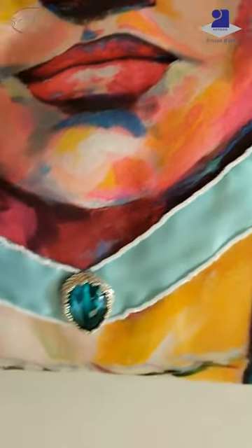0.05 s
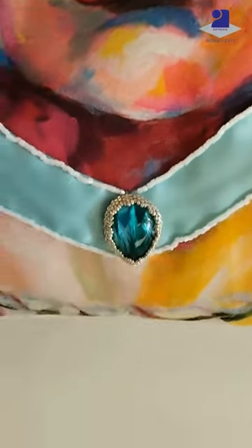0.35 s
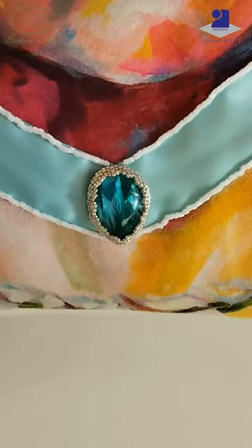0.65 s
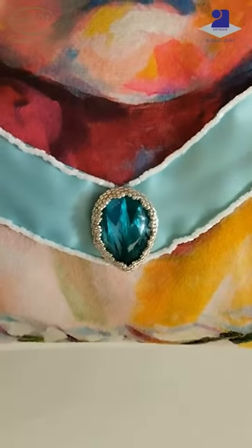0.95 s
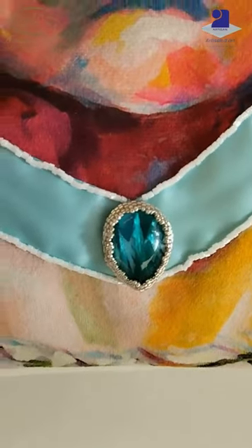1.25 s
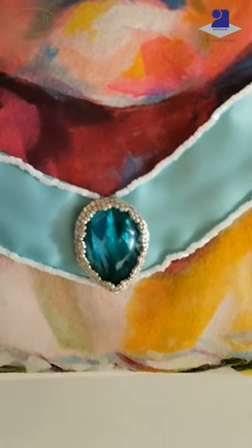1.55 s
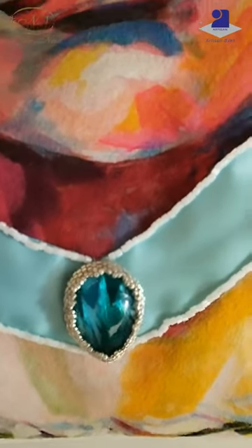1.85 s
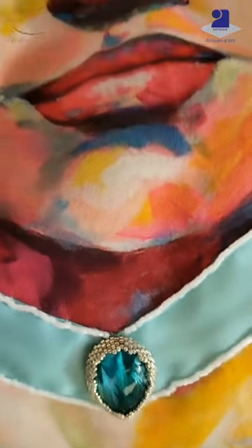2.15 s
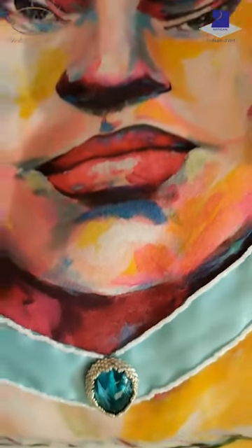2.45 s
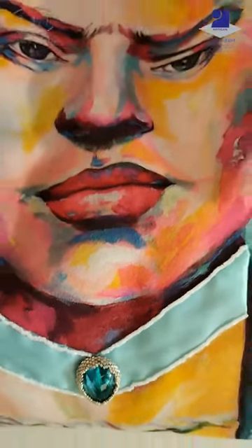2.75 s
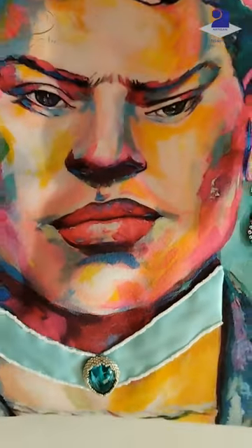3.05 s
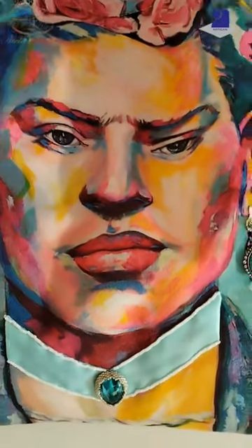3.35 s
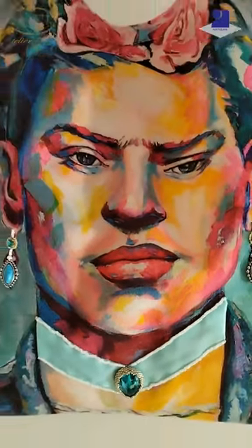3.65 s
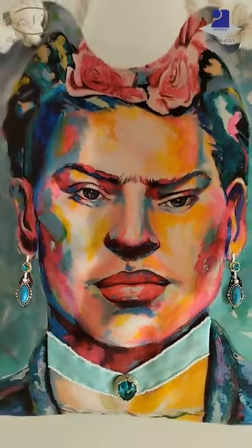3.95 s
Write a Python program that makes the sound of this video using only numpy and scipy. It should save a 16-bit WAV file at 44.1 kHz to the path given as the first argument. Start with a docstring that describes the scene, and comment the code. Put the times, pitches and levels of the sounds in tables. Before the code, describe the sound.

Quiet room tone runs for all 4 seconds, with faint microphone hiss and a deep rumble that comes and goes. A low hum swells around 0.5 seconds and again after 3. Tiny camera clicks come near 1 and 1.5 seconds. Soft handling rustles are scattered throughout, clustering around 3 seconds. A far roar, likely traffic, grows from 2 seconds, with a low engine throb rising near the end.

```python
"""A steady wash of air in a quiet room, over the faint hiss of a hand-held camera's microphone.
A deep rumble comes and goes, a wavering hum swells twice, and a far roar, likely traffic, slowly grows.
The hand on the camera makes two tiny clicks of the case and soft rustles of skin and sleeve.
Air, roar and handling are shaped noise; the hum, a shudder and an engine throb are wavering sines."""
import sys
import numpy as np
from scipy import signal
from scipy.fft import rfft, irfft
from scipy.io import wavfile

SR = 44100
rng = np.random.default_rng(int(sys.argv[2]) if len(sys.argv) > 2 else 0)


def dump_mix(stems):
    """Bounce the given channels to the path in sys.argv[1] as a 16-bit WAV at rate SR."""
    frames = np.atleast_2d(stems).T  # one column per channel
    limited = np.clip(frames, -1, 1)  # hard clip at full scale
    pcm = np.round(limited * 32767).astype(np.int16)
    wavfile.write(sys.argv[1], SR, pcm)


N = 176400
TIME, FREQS = np.arange(N) / SR, np.fft.rfftfreq(N, 1 / SR)


def air(wash_db=-60, whine_db=-86.5):
    """Room tone: a dark, steady wash of air with a thin appliance whine."""
    # colour of the air: freq_hz, level_db
    spectrum = [(25, 1.5), (60, 2), (100, -2.5), (170, -6), (270, -7.5), (370, -15.5), (540, -18),
                (680, -20), (1000, -21.5), (1400, -25), (1700, -28), (2300, -29), (3000, -33),
                (5000, -38.5), (8000, -51), (15000, -60)]
    wash = patchy(noise(amp(over_hz(spectrum))), depth_db=2.1)
    whine = noise(peak(2016, width_hz=37))
    return amp(wash_db) * wash + amp(whine_db) * whine


def rumble(shudder_hz=32.5, waver_hz=3.48, flutter_db=1.5, sway_db=3):
    """A deep rumble with a narrow shudder that swells, sinks and sways between left and right."""
    # colour of the rumble: freq_hz, level_db
    spectrum = [(6, -1.5), (16, 6.5), (24, -2.5), (33, -1), (45, -8.5), (60, -8.5), (80, -21.5),
                (140, -32.5), (400, -72)]
    # rise and fall of the rumble: time_s, level_db
    bed_fader = [(0, -47), (.4, -53.5), (.75, -51.5), (1.02, -52), (1.5, -50.5), (1.72, -55), (2.4, -50),
                 (3, -53), (4, -51)]
    # surges of the shudder: time_s, level_db
    shudder_fader = [(0, -66), (.3, -74), (.5, -71), (.78, -77), (.82, -44.5), (.88, -47), (.96, -60),
                     (1.05, -58), (1.13, -50), (1.28, -44), (1.47, -44.5), (1.6, -48.5), (1.69, -54),
                     (1.8, -49), (2.08, -48.5), (2.25, -60), (2.32, -40.5), (2.42, -61), (2.7, -62),
                     (2.88, -51.5), (3.15, -61), (4, -71.5)]
    shudder = tone(shudder_hz + waver_hz * wander(8)) * amp(flutter_db * wander(7.1))
    sway = pan(sway_db) ** wander(14)
    bed = noise(amp(over_hz(spectrum)))
    return bed * level(bed_fader) + unit(shudder * sway) * level(shudder_fader)


def hum(waver_hz=3.2, flutter_db=0.6, skirt_db=-6):
    """One low, drifting tone in a skirt of noise, strongest near the start and the end."""
    # path of the hum: time_s, pitch_hz, level_db
    path = [(0, 210.7, -68), (.17, 201.3, -70), (.4, 204.6, -65.5), (.58, 207.1, -66.5), (.74, 202.1, -82),
            (1.6, 204, -88), (2.5, 206.9, -74.5), (2.95, 209, -79.5), (3.14, 205, -66), (3.44, 199.9, -62),
            (3.56, 202, -66), (3.68, 209.4, -65.5), (3.84, 198, -66), (4, 198.6, -79)]
    hz, gain = course(path)
    line = tone(hz + waver_hz * wander(8)) * amp(flutter_db * wander(7.6))
    skirt = amp(skirt_db) * noise(peak(203.3, width_hz=24))
    return gain * unit(line + skirt)


def swell():
    """A short, soft rise of low noise under the first hum."""
    # colour of the swell: freq_hz, level_db
    spectrum = [(100, -26), (155, -5), (190, -10), (222, 4.5), (290, -20), (410, -8.5), (470, -17),
                (540, -12.5), (700, -24.5), (2000, -49.5)]
    # its rise and fall: time_s, level_db
    fader = [(0, -76), (.25, -76), (.42, -66.5), (.56, -70), (.8, -100)]
    return noise(amp(over_hz(spectrum))) * level(fader)


def traffic(waver_hz=3.7):
    """A far roar, a low drone and the throb of an engine speeding up, all growing toward the end."""
    # colour of the roar: freq_hz, level_db
    roar_spectrum = [(60, -9), (130, 2), (280, 0), (420, -1), (600, -1.5), (770, -2), (900, -4.5),
                     (1100, -4.5), (1500, -13), (2200, -14.5), (4000, -25.5), (8000, -36.5), (15000, -66)]
    # early dip and slow build of the roar: time_s, level_db
    roar_fader = [(0, -73.5), (.45, -79), (.8, -85), (1.8, -79), (2.1, -73), (2.42, -71), (2.6, -73),
                  (2.72, -67), (3.55, -66), (3.78, -65.5), (3.92, -62.5), (4, -62.5)]
    # colour of the drone, above the rumble: freq_hz, level_db
    drone_spectrum = [(10, -8.5), (40, -3.5), (60, 0.5), (80, -12), (110, -8), (160, -6), (220, -12.5),
                      (300, -12.5), (450, -34), (900, -63)]
    # late rise of the drone: time_s, level_db
    drone_fader = [(0, -67), (3.1, -70), (3.4, -61.5), (3.6, -60.5), (3.78, -63), (4, -55)]
    # climb of the engine throb: time_s, pitch_hz, level_db
    throb_path = [(2.9, 35.8, -87), (3.15, 41.4, -59.5), (3.4, 47, -62), (3.6, 56, -53), (3.75, 58.53, -65),
                  (3.87, 60.46, -64), (4, 58, -52.5)]
    roar = patchy(noise(amp(over_hz(roar_spectrum))), depth_db=2.1, size=(5, 25))
    hz, gain = course(throb_path)
    throb = gain * tone(hz + waver_hz * wander(18))
    drone = noise(amp(over_hz(drone_spectrum)))
    return roar * level(roar_fader) + drone * level(drone_fader) + throb


def clicks(rise_s=0.00053, decay_s=0.001, tail_db=-18, tail_s=0.006):
    """Tiny bright ticks of the camera's case, each a snap with a short tail."""
    # ticks: start_s, level_db, left_over_right_db
    ticks = [(0.955, -72, 4), (1.5017, -65.5, 12)]
    # resonances of the case: freq_hz, width_hz, level_db
    modes = [(5600, 700, 3), (12500, 830, 5), (13600, 490, 9)]
    ring = noise(sum(amp(db) * peak(hz, width) for hz, width, db in modes))
    out = np.zeros((2, N))
    for start, db, pan_db in ticks:
        age = np.maximum(TIME - start, 0)
        attack = np.minimum(age / rise_s, 1)
        fall = np.maximum(age - rise_s, 0)
        decay = np.exp(-fall / decay_s) + amp(tail_db) * np.exp(-fall / tail_s)
        out += amp(db) * pan(pan_db) * attack * decay * ring
    return out


def rustles(fade_s=0.014, grain_db=1, pan_db=-2):
    """Short grainy slides of skin and sleeve, dull or bright; some ring with a narrow "shh"."""
    # slides: start_s, length_s, level_db, treble_tilt_db_per_octave, shh_strength (negative cuts a notch)
    slides = [(0.408, 0.043, -77, -8, 0), (0.75, 0.068, -76.5, -2.5, 0.13), (1.143, 0.049, -83, -3, 0.21),
              (1.513, 0.095, -78.5, .7, .3), (2.115, 0.034, -77, 5, 0), (2.186, 0.03, -88, -3, 0),
              (2.494, 0.036, -80, 7, 6.1), (2.66, 0.036, -77, 1, 0.033), (2.769, 0.053, -78, -4, -1),
              (2.839, 0.06, -72, -3, 0), (2.886, 0.099, -74.5, -.3, 1.3), (2.975, 0.083, -72.5, -0.5, 0.87),
              (3.1, 0.063, -80, 4, 2.07), (3.182, 0.042, -78, 0, 0), (3.255, 0.037, -75, -3, 0.12),
              (3.931, 0.069, -82.5, 4, 4)]
    # colour of the friction: freq_hz, level_db
    spectrum = [(500, -1), (2000, 6.5), (3000, 4), (3800, 6.5), (4600, 3), (5500, 5), (7000, 0.5),
                (10000, 4), (11300, 2.5), (12500, 3), (14800, 4.5)]
    grain = noise(amp(over_hz(spectrum))) * amp(grain_db * wander(270))
    friction = rfft(patchy(grain, depth_db=2.5, size=(31, 11)))
    treble_octaves = np.log2(np.maximum(FREQS / 2000, 1))
    out = np.zeros((2, N))
    for start, length, db, tilt_db, shh in slides:
        stroke = np.clip(np.minimum(TIME - start, start + length - TIME) / fade_s, 0, 1)
        colour = amp(tilt_db * treble_octaves) * (1 + shh * peak(5390, width_hz=280))
        out += amp(db) * stroke * unit(irfft(friction * colour, N))
    return pan(pan_db) * out


def hiss(level_db=-82.5, flicker_db=1.55):
    """The microphone's faint, slightly restless hiss, close to the centre."""
    # colour of the hiss: freq_hz, level_db
    spectrum = [(3000, -16), (6500, -1), (8300, -5), (10000, -2), (11200, -6.5), (12400, 0.5), (13600, 2.5),
                (15300, 1)]
    gain = amp(level_db + flicker_db * wander(35))
    return gain * patchy(noise(amp(over_hz(spectrum))), depth_db=4, size=(13, 11))


def noise(gain):
    """Diffuse stereo noise of rms 1 with the given spectrum."""
    # how alike left and right are: freq_hz, correlation (0-1)
    likeness = [(33, 0.8), (70, 0), (200, 0.6), (500, 0.3), (1000, 0.3), (2000, .02), (4500, .05),
                (6200, 0.5), (7200, 1), (15000, 1)]
    # stereo balance: freq_hz, left_over_right_db
    balance = [(40, 1), (500, 0.5), (1000, -0.6), (2000, -3), (4000, -0.9), (8000, -0.7), (14000, 0.5)]
    a, b = rfft(rng.standard_normal((2, N)))
    same, lean = over_hz(likeness), amp(over_hz(balance) / 2)
    mid, side = a * np.sqrt(1 + same), b * np.sqrt(1 - same)
    stereo = np.array([(mid + side) * lean, (mid - side) / lean])
    return unit(irfft(stereo * gain / np.sqrt(1 + same), N))


def patchy(x, depth_db, size=(7, 9)):
    """Lets a noise flicker in small patches; size is (frequency bins, time frames)."""
    bands = signal.stft(x, nperseg=1024, noverlap=768)[2]
    patch = np.outer(np.hanning(size[0]), np.hanning(size[1]))
    flicker = unit(signal.fftconvolve(rng.standard_normal(bands.shape[1:]), patch, "same"))
    return unit(signal.istft(bands * amp(depth_db * flicker), nperseg=1024, noverlap=768)[1][:, :N])


def tone(hz):
    """A sine of rms 1 that follows a pitch curve."""
    return np.sqrt(2) * np.sin(2 * np.pi * np.cumsum(hz) / SR)


def wander(rate_hz):
    """Smooth random drift of rms 1, up to about the given rate."""
    lowpass = np.exp(-(FREQS / rate_hz) ** 2) * (FREQS > 0)
    return unit(irfft(rfft(rng.standard_normal(N)) * lowpass, N))


def peak(hz, width_hz):
    """Gain of a resonance, halved at width_hz to either side."""
    return 1 / (1 + ((FREQS - hz) / width_hz) ** 2)


def over_hz(points):
    """Reads a table along log frequency."""
    hz, value = np.transpose(points)
    return np.interp(np.log(FREQS + 1), np.log(hz + 1), value)


def level(points):
    """Reads a dB fader curve along time, as gain."""
    return amp(np.interp(TIME, *np.transpose(points)))


def course(points):
    """Reads a path of pitch and level along time, as Hz and gain."""
    s, hz, db = np.transpose(points)
    return np.interp(TIME, s, hz), amp(np.interp(TIME, s, db))


def pan(db):
    """Left and right gains; positive dB leans left."""
    return amp(np.array([[db], [-db]]) / 2)


def amp(db):
    """Decibels to gain."""
    return 10 ** (np.asarray(db) / 20)


def unit(x):
    """Scales to rms 1."""
    return x / np.sqrt(np.mean(x ** 2) + 1e-30)


def scene():
    """The room, the far traffic and the handling noise, mixed."""
    return air() + hiss() + traffic() + rumble() + hum() + swell() + clicks() + rustles()


def record(dry):
    """A steep high cut takes off the very top of the treble."""
    cutoff_hz = 15550
    taps = signal.firwin(511, cutoff_hz, window=("kaiser", 9), fs=SR)
    return signal.oaconvolve(dry, taps[None], "same")


dry = scene()
out = record(dry)
dump_mix(out)
```